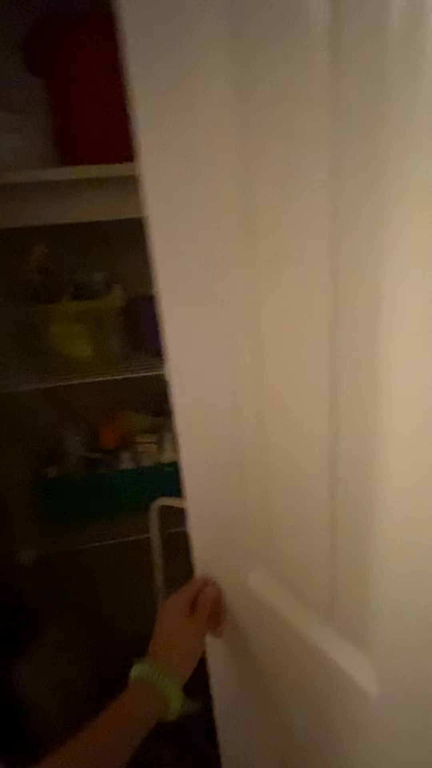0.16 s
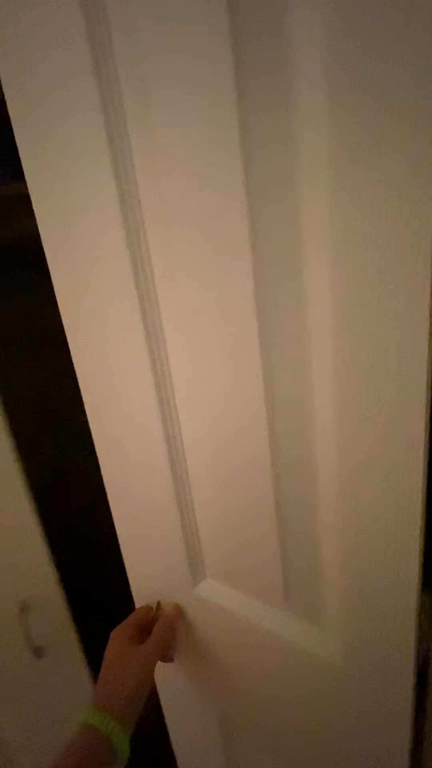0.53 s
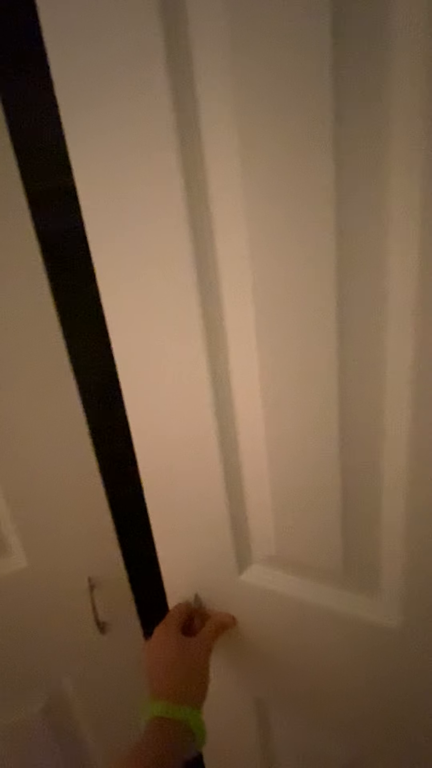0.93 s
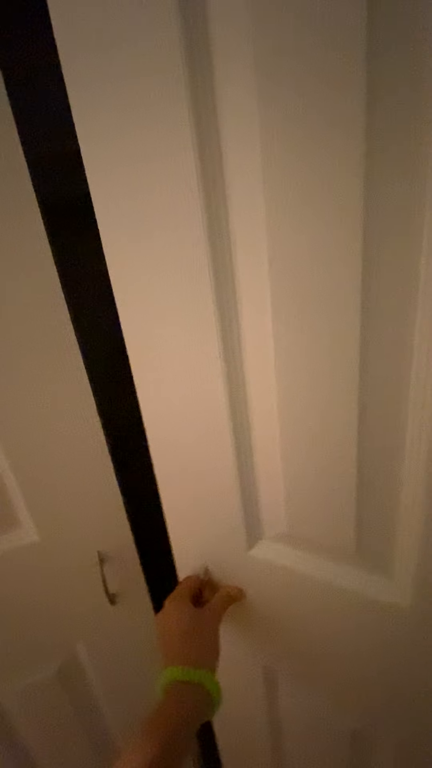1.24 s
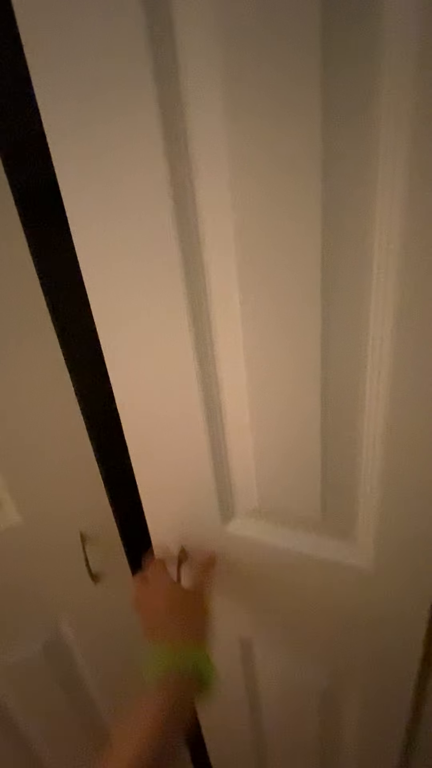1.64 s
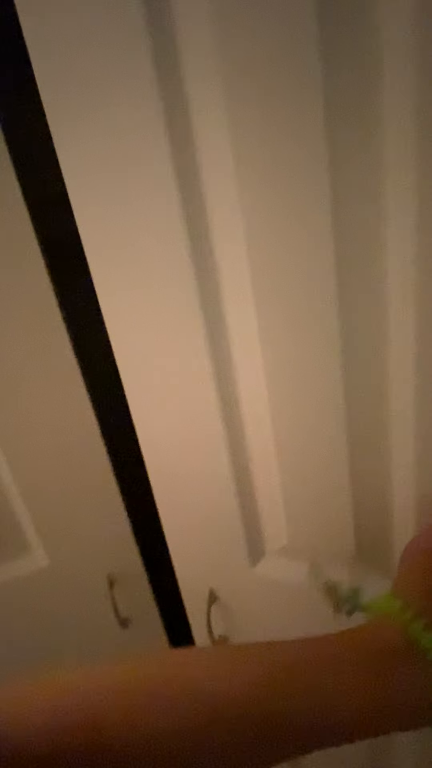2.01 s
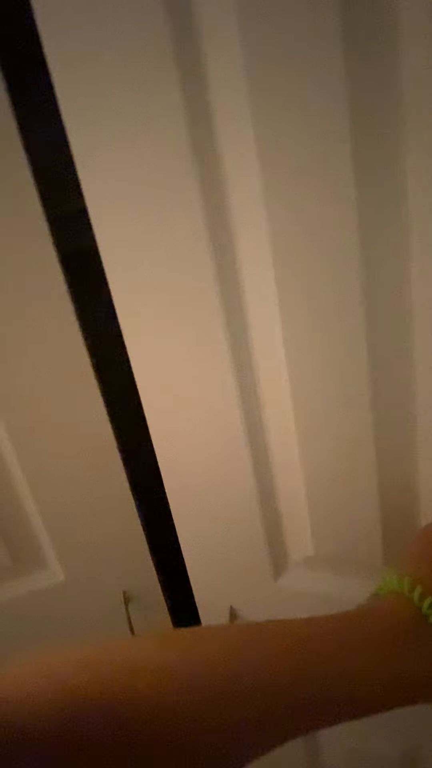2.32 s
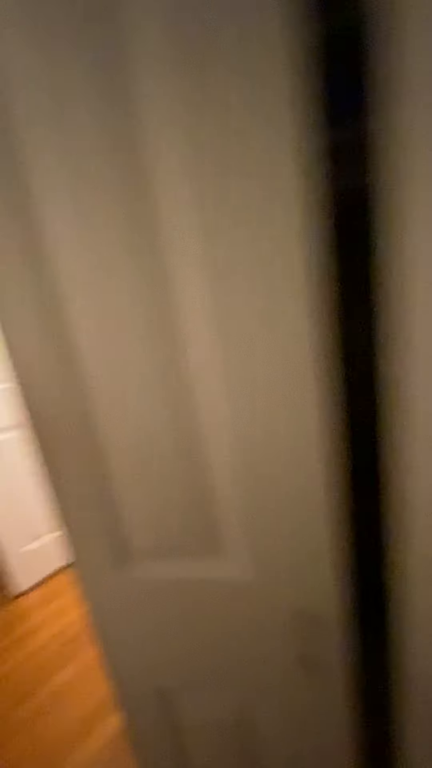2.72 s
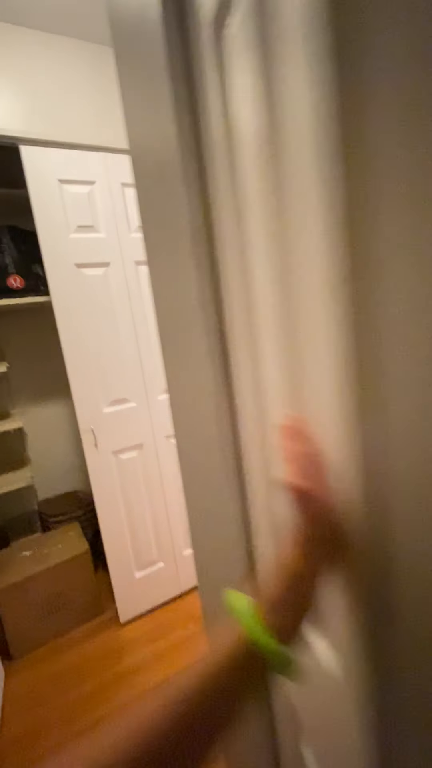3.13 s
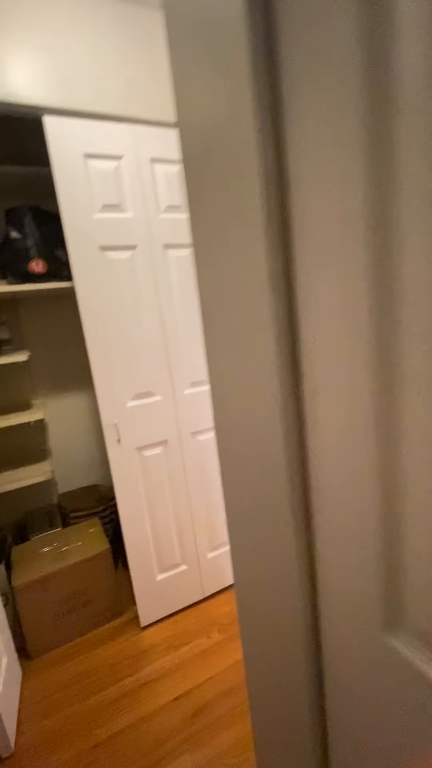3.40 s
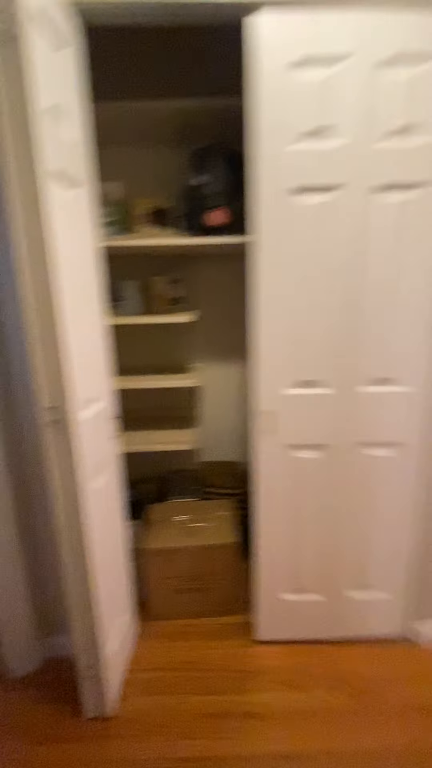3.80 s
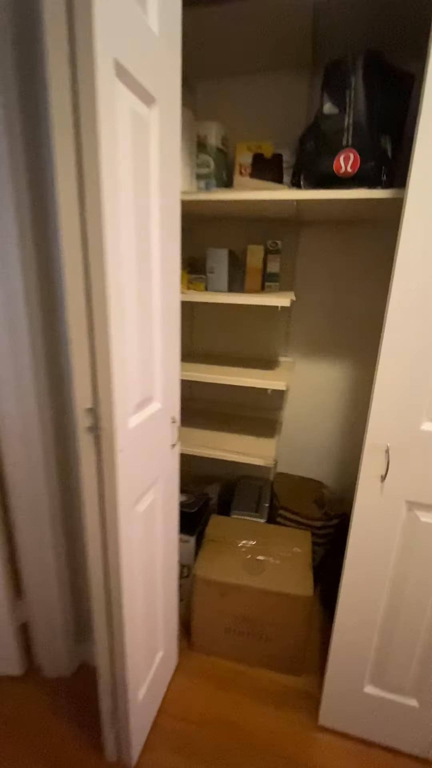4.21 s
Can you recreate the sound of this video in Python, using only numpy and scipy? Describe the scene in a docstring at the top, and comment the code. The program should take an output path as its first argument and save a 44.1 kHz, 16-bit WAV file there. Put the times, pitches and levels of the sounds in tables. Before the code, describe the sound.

A hollow folding closet door is drawn along its track, close to the microphone in a bare room. From 0 to 0.9 s there is uneven low rubbing and thin scraping, a soft bump, short groaning squeaks, then knocks and dry clicks around 0.6 to 0.9 s. Movement slows, with separate wooden knocks near 1.0, 1.2 and 1.4 s. Around 1.8 s a loose handle rattles lightly; a firm bump lands at 1.9 s. From 2.2 to 2.7 s comes the loudest stretch: rapid thuds, hinge knocks and rattling, ringing metal track. Keys jingle faintly from about 2.75 s, with small clicks and a thin spring twang to 3.1 s. A final push at 3.45 to 3.9 s brings wooden claps, knocks, a low judder and dull bumps. After that the rubbing dies away into quiet room hush, with a barely audible key tinkle just after 4 s.

```python
"""In a bare room, hollow folding closet doors are pulled open by hand, close to the microphone.
Guide pins scrape, squeak and catch in the metal top track: shaped noise, gliding tones and ringing rail modes.
Hinges knock, panel edges clap and panels shudder with dull bumps: damped wood modes and short noise bursts.
A loose handle rattles, a pin spring twangs and keys on the wrist jingle faintly: clusters of small ringing modes.
"""
import sys
import numpy as np
from scipy import signal
from scipy.fft import rfft, irfft, next_fast_len
from scipy.io import wavfile
from scipy.ndimage import uniform_filter1d, map_coordinates

SR = 44100
rng = np.random.default_rng(int(sys.argv[2]) if len(sys.argv) > 2 else 0)


def inscribe(sig):
    """Save sig as 16-bit PCM at rate SR to the path in sys.argv[1].

    A 1-D sig is mono; a 2-D sig holds one channel per row.
    Samples are clipped to [-1, 1] before scaling.
    """
    pcm = np.round(np.clip(np.atleast_2d(sig).T, -1, 1) * 32767)
    wavfile.write(sys.argv[1], SR, pcm.astype(np.int16))


N = 191923  # length in samples
AGE = np.arange(SR * 3 // 5) / SR  # seconds since a blow; every struck sound is cut at 0.6 s

# In all tables level_db and its kin are relative: each layer adds its own trim in the mix.
# the first door drawn along at an uneven speed: time_s, scrape_db, rub_db, shudder_db
OPENING = [(.06, -49, -40.5, -40.5), (.2, -48.5, -45.5, -45), (.35, -46, -38.5, -50.5),
           (.52, -52.5, -40.5, -46.5), (.74, -48, -35.5, -36), (.85, -54.5, -44.5, -50),
           (1.1, -73, -65, -61)]
# later pushes of the hand, each held and then coasting:
# start_s, hold_s, coast_t60_s, scrape_db, rub_db, shudder_db
PUSHES = [(1.206, 0.013, 0.19, -52, -37, -43), (1.631, 0.032, 0.63, -69, -41.5, -44.5),
          (1.769, 0.044, 0.56, -50, -35, -36), (2.007, 0.01, 1.2, -46, -35.5, -41.5),
          (2.182, 0.17, 3.1, -46, -37, -27.5), (3.187, 0.03, 0.51, -50.5, -46, -49.5),
          (3.455, 0.37, 0.49, -50.5, -41, -33)]
# friction floor of a door that is barely moving: scrape_db, rub_db, shudder_db
RESTING_DB = [-79.5, -59.5, -70]
# rough groans and squeaks of stick and slip: start_s, length_s, start_hz, end_hz, width_hz, level_db
SQUEAKS = [(0.049, .16, 410.6, 426.4, 25.5, -42), (0.313, .15, 400.4, 438, 24.2, -43),
           (0.24, 0.27, 1370, 1260, 80, -57), (1.922, .018, 5700, 5730, 200, -44.5),
           (1.378, .045, 1100, 1020, 110, -53), (1.505, 0.083, 1100, 1020, 130, -57),
           (3.185, .1, 2950, 3080, 300, -57.5)]
# the hand bumps a panel, or it swings against its stop: start_s, level_db, tilt_db_per_octave
BUMPS = [(0.082, -21.5, 1), (0.685, -24.5, -1.5), (1.223, -21.5, -2.5), (1.926, -15, -1.5),
         (2.06, -20, -2.5), (2.261, -16, 6), (2.369, -9, 4), (2.591, -13, 0.5), (2.8, -20.5, -14),
         (3.64, -17, 1.5), (3.879, -23.5, -15.5)]
# small dry clicks of the hardware: start_s, level_db
TICKS = [(0.242, -27), (0.755, -20.5), (0.86, -25), (0.88, -26.5), (1.139, -47.5), (1.414, -29),
         (1.664, -41.5), (1.9223, -33.5), (1.999, -31), (2.816, -20.5), (2.9936, -22.5), (3.022, -28),
         (3.089, -27), (3.408, -38)]
# hinges knocking as the doors fold: start_s, level_db, pitch_hz, clatter_db
KNOCKS = [(0.561, -25.5, 428, -19), (0.566, -21.5, 703, -22.5), (0.595, -45.5, 560, -12),
          (0.8812, -24.5, 398, -11.5), (0.9487, -43, 588, -1.5), (0.995, -16, 379.6, -23.5),
          (1.222, -23, 274.6, -17.5), (1.415, -20.5, 388.3, -16), (1.588, -43, 520, -2.5),
          (1.662, -33.5, 470, -11.5), (1.695, -37.5, 402, -6.5), (1.925, -21, 387, -23),
          (2.195, -17.5, 295, -13.5), (2.24, -29, 542, -5.5), (2.284, -18.5, 643, -8),
          (2.355, -16, 593, -10), (2.412, -21.5, 846, -8.5), (2.46, -19.5, 432, -8.5),
          (2.516, -20, 558, -11.5), (2.587, -23.5, 257, -36), (2.654, -27, 668, -16.5),
          (2.797, -25, 234, -30), (2.892, -26.5, 301.5, -15.5), (2.987, -30.5, 349, -15.5),
          (3.487, -24, 524, -16.5), (3.526, -21.5, 358, -24), (3.569, -20.5, 718, -9),
          (3.597, -26, 615, -10.5), (3.628, -25.5, 560, -7), (3.789, -27.5, 547, -7.5)]
# a pin catches in the track and jolts the panel: start_s, level_db, metal_edge_db, jolt_db
CATCHES = [(0.7734, -26, -26, -35), (1.1947, -39, -47, -61), (1.4148, -33, -11, -34),
           (2.0412, -33.5, -15.5, -32), (2.1957, -29, -8.5, -12.5), (2.2274, -27, -14, -17.5),
           (2.283, -21, -8.5, -7.5), (2.3414, -26, -13.5, -5.5), (2.4105, -20, -12, -6.5),
           (2.4527, -42, -10, -9.5), (2.5121, -22.5, -14.5, -10), (2.55, -25.5, -20.5, -19.5),
           (2.65, -22.5, -11.5, -16), (2.6975, -29, -11, -16), (2.7801, -30, -9.5, -20.5),
           (3.115, -38, -10.5, -26.5), (3.4077, -46, -3.5, -33.5), (3.5137, -28.5, -28.5, -12),
           (3.5662, -26.5, -21, -7.5), (3.6711, -31.5, -44, -21), (3.7351, -31.5, -36, -22)]
# the loose metal handle rattles under the fingers: start_s, length_s, level_db
RATTLES = [(1.761, 0.023, -42), (1.802, .04, -36), (2.011, .05, -30)]
# the wrist swings and the keys jingle: start_s, length_s, level_db
JINGLES = [(1.821, .15, -61), (1.993, 0.015, -48), (2.74, .38, -43), (4.055, 0.09, -63)]
# a sprung pivot pin twanging: start_s, level_db, t60_s
TWANGS = [(2.783, -55, .45), (3.003, -51.5, .4), (3.112, -50, .45)]
# a panel edge claps against its neighbour: start_s, level_db
CLAPS = [(3.446, -27), (3.5243, -16.5), (3.674, -25), (3.738, -26)]
# the dragged panel judders: start_s, hold_s, level_db
DRONES = [(3.528, 0.033, -17.5), (3.647, 0.1, -26), (3.809, 0.022, -30.5)]

# low modes of the hollow door panel: mode_hz, level_db, t60_s
PANEL_MODES = [(62.8, -4.5, 0.51), (77.9, 1.5, 0.27), (130.4, -0.5, 0.25), (158.6, -0.5, 0.24),
               (212.6, -4, 0.14), (258.5, -8.5, 0.37)]
# modes of the door frame and skins: mode_hz, level_db, t60_s
FRAME_MODES = [(371.6, -1.5, 0.4), (415, 5.5, 0.22), (620, -1, 0.12), (1013, 2, 0.14), (1387, 5.5, 0.05)]
# modes of the metal track, before extra damping: mode_hz, level_db, t60_s
RAIL_MODES = [(3340, -1, 0.21), (3740, 5.5, 0.12), (3606, 3.5, 0.19), (3840, -4, 0.15), (4530, 3.5, 0.19)]
# modes of the handle on its door skin: mode_hz, level_db, t60_s
HANDLE_MODES = [(588, -1.5, 0.085), (652, 1, 0.067), (1382, -1, 0.097), (2094, -8, 0.084),
                (2770, -9, 0.077), (3930, -10, 0.052)]
# modes of a small key: mode_hz, level_db, t60_s
KEY_MODES = [(7520, -5, .15), (11360, 0, .15), (11490, -5, .1), (13114, -14, .16)]
# partials of a struck wooden stile: pitch_multiple, level_db
STILE = [(1, 0), (1.53, -11.5), (2.17, -15.5)]

# pins grating in the track: freq_hz, level_db
SCRAPE = [(500, -23), (1100, -0.5), (1900, 5), (6200, 5), (8500, -2.5), (11000, -41.5), (14000, -2),
          (16000, -8.5)]
# wooden panels rubbing: freq_hz, level_db
RUB = [(120, -26.5), (250, -0.5), (410, 2), (700, -8), (1300, -13), (2200, -30), (5000, -52.5)]
# low shudder of the panels: freq_hz, level_db
SHUDDER = [(20, -12), (40, -7.5), (62, -2), (80, -1.5), (100, -1), (135, -7.5), (160, 1.5), (188, -23),
           (220, -7), (300, -21.5), (700, -100)]
# woody body of a knock: freq_hz, level_db
WOOD = [(90, -9.5), (230, 6.5), (430, 5), (640, -6.5), (900, -9), (2000, -63.5)]
# loose clatter of the frame: freq_hz, level_db
CLATTER = [(300, 3.5), (650, 7), (950, -7.5), (1500, -9), (2200, -9), (6000, -32.5)]
# rattle of the metal track: freq_hz, level_db
TRACK = [(300, 17), (800, 6.5), (1400, 3), (1900, -9.5), (2600, 6), (4200, 9), (4800, 3.5), (5800, 6.5),
         (7800, -0.5), (10000, -44), (15000, -5)]
# bright edge of metal on metal: freq_hz, level_db
EDGE = [(4000, -22), (7600, 1), (10000, -7), (12500, 0), (14500, 0), (15800, -6)]
# tiny hard click: freq_hz, level_db
CLICK = [(800, -47), (2500, 1.5), (5500, 14.5), (9000, -2), (15000, 12.5)]
# flat wood on wood: freq_hz, level_db
CLAP = [(300, 0.5), (720, 9.5), (950, 1), (1350, 2), (1850, -4.5), (2600, -6), (6000, -38)]
# hush of the room: freq_hz, level_db
HUSH = [(20, -54), (58, 10.5), (170, -8), (400, -51), (2000, -23), (5000, -30), (9000, -86)]
# decay of the bare room: freq_hz, t60_s
ROOM = [(60, 1), (250, 0.32), (700, 0.35), (2000, 0.42), (5000, 0.29), (13000, 0.074)]
# likeness of left and right: freq_hz, correlation (plain number)
ALIKE = [(290, 0.98), (640, 0.46), (1400, 0.11), (3100, 0.44), (5500, 0.21), (8000, 0.23), (14000, 0.35)]

START_S = 0.009  # time a door takes to get going
GRIT_PER_S, GRIT_DB = 140, -2  # slips of the pins, and their level against the grating
JOLT_LAG_S, JOLT_TILT_DB = 0.01461, 5  # the panel follows the pin; tilt per octave at 0 dB of edge
TILT_PER_EDGE, CLATTER_PER_EDGE = 0.42, -0.11  # dB per dB: less edge, duller thud, more wooden clatter
# the joints knock with every jolt, each at another spot (spread is of log pitch)
JOINT_DB, JOINT_HZ, JOINT_SPREAD, JOINT_CLATTER_DB = -13, 329.5, 0.17, -13.5
RING_CYCLES = 79  # cycles in a stile mode's t60: higher notes die sooner
TAP_DB, TAP_EDGE_DB = -5, -45  # a hinge's clatter also taps the track, with little metallic edge
CONTACTS_PER_S = 320  # of the rattling handle
TOUCHES_PER_S, TOUCH_SCATTER_DB, JINGLE_FADE_DB = 55, 2.5, 2  # of the keys
SPRING_HZ = 5782
DRONE_HZ, DRONE_RISE_S, DRONE_T60_S = 159, .02, 0.23
LEAD_S = 6e-5  # left microphone ahead of the right
TOP_HZ = 15800  # band limit


def amp(db):
    """Decibels to gain."""
    return 10 ** (np.asarray(db) / 20)


def unit(x):
    """x at rms 1."""
    return x / np.sqrt(np.mean(x ** 2) + 1e-20)


def along(points, hz):
    """(Hz, value) points read on a log frequency axis."""
    f, v = np.transpose(points)
    return np.interp(np.log(hz + 1), np.log(f + 1), v)


def wobble(rate):
    """A smooth random curve, rate knots a second."""
    knots = rng.standard_normal(int(N * rate / SR) + 4)
    return map_coordinates(knots, [np.arange(N) * rate / SR])


def noise(spectrum, size):
    """Coloured noise of rms 1 at two spaced microphones, whose likeness varies with frequency."""
    m = next_fast_len(size)
    hz = np.fft.rfftfreq(m, 1 / SR)
    # the mid/side balance sets the correlation of left and right
    turn = np.arccos(np.clip(along(ALIKE, hz), -.999, .999)) / 2
    white = rfft(rng.standard_normal((2, m)))
    coloured = white * amp(along(spectrum, hz))
    mid, side = irfft(coloured * [np.cos(turn), np.sin(turn)], m)[:, :size]
    return unit(np.array([mid + side, mid - side]))


def fade(t60):
    """Exponential decay by 60 dB in t60 seconds."""
    return np.exp(-np.log(1000) * AGE / t60)


def onset(attack):
    """Soft exponential start with time constant attack in seconds."""
    return 1 - np.exp(-AGE / attack)


def burst(spectrum, t60, room_db, attack):
    """A dense ring after a blow, and the bare room's answer, which dies at its own rate in each band."""
    hz, t, z = signal.stft(noise(spectrum, len(AGE)), SR, nperseg=256)
    decay = np.exp(-np.log(1000) * t / along(ROOM, hz)[:, None])
    tail = signal.istft(z * decay, SR, nperseg=256)[1][:, :len(AGE)]
    direct = noise(spectrum, len(AGE)) * fade(t60)
    return (direct + amp(room_db) * tail) * onset(attack)


def ring(modes, scatter_db, detune):
    """Damped modes, with new strengths and slightly new pitches at each blow."""
    chance = rng.standard_normal((len(modes), 2))
    total = 0
    for (hz, db, t60), (a, b) in zip(modes, chance):
        tone = np.sin(2 * np.pi * hz * (1 + detune * b) * AGE)
        total = total + amp(db + scatter_db * a) * fade(t60) * tone
    return total


def chatter(depth_db):
    """Gain of parts that touch again and again just after a blow."""
    return unit(amp(depth_db * wobble(420)[:len(AGE)]))


def add(track, s, sound):
    """Mix a sound into the track at time s."""
    start = max(round(s * SR), 0)
    track[:, start:start + len(AGE)] += sound[..., :N - start]


def moments(length, per_s):
    """Progress (0 to 1) of small contacts at uneven moments through a cluster."""
    count = max(round(length * per_s), 1)
    return (np.arange(count) + rng.random(count)) / count


def stroke(s, rise, hold, t60):
    """Gain of a movement that starts at s: rise, hold, then exponential coasting."""
    t = np.arange(N) / SR - s
    coasting = np.exp(-np.log(1000) * np.maximum(t - rise - hold, 0) / t60)
    return np.clip(t / rise, 0, 1) * coasting


def patchy(x, depth_db, size):
    """x with patches of random gain over pitch and time; size = (bins, frames) of the smoothing."""
    z = signal.stft(x, nperseg=1024)[2]
    field = rng.standard_normal(z.shape[1:])
    for _ in range(2):
        field = uniform_filter1d(field, size[0], 0)
        field = uniform_filter1d(field, size[1], 1)
    return unit(signal.istft(z * amp(depth_db * unit(field)), nperseg=1024)[1][:, :N])


def closet(x, echo_db):
    """Near walls send back weak copies within about 20 ms, slightly apart at each microphone: a comb."""
    out = x.copy()
    for delay, skew in rng.uniform([.001, -.0003], [.02, .0003], (7, 2)):
        lags = [round((delay + skew) * SR), round((delay - skew) * SR)]
        for side, lag in enumerate(lags):
            out[side, lag:] += amp(echo_db - 860 * delay) * x[side, :-lag]
    return out


def friction_levels():
    """Scrape, rub and shudder in dB: all three follow the opening pull and the later pushes of the hand."""
    times, *opening_db = np.transpose(OPENING)
    opening = amp([np.interp(np.arange(N) / SR, times, db) for db in opening_db])
    power = amp(RESTING_DB)[:, None] ** 2 + opening ** 2
    for s, hold, t60, *levels_db in PUSHES:
        push = amp(levels_db)[:, None] * stroke(s, START_S, hold, t60)
        power = power + push ** 2
    return 10 * np.log10(power)


def grit(count=4):
    """Tiny sticks and slips of the pins tick the track, in a few different grains of noise."""
    out = np.zeros((2, N))
    for _ in range(count):
        slips = (rng.random(N) < GRIT_PER_S / count / SR) * rng.random(N)
        tick = noise(SCRAPE, len(AGE)) * fade(.018) * onset(.001)
        out += signal.fftconvolve(slips[None], tick, axes=1)[:, :N]
    return unit(out)


def frame_taps():
    """Soft slips of random strength tap the frame's low modes, which ring differently at each side."""
    slips = (rng.random(N) < 150 / SR) * rng.standard_normal(N)
    low_modes = [mode for mode in FRAME_MODES if mode[0] < 900]
    sides = []
    for _ in range(2):
        tap = ring(low_modes, scatter_db=3.5, detune=0.018) * fade(0.13)
        sides.append(signal.fftconvolve(slips, tap)[:N])
    return unit(np.array(sides))


def sliding():
    """Uneven friction: the pins grate in the track, the panels rub and shudder, and slips tap the frame."""
    scrape_db, rub_db, shudder_db = friction_levels()
    grip = wobble(34.96)
    grating = patchy(noise(SCRAPE, N), depth_db=2.6, size=(14, 3))
    scrape_gain = amp(scrape_db - 2 + 1.1 * grip + 2.4 * wobble(500))
    scrape = scrape_gain * unit(grating + amp(GRIT_DB) * grit())
    rubbing = patchy(noise(RUB, N), depth_db=4, size=(3, 5))
    rub = amp(rub_db - 5.5 + 2.2 * grip) * (amp(1) * rubbing + amp(-4) * frame_taps())
    shudder = amp(shudder_db + 2.0) * noise(SHUDDER, N)
    return closet(scrape + rub, echo_db=-5.5) + shudder


def squeaks():
    """Sticking and slipping makes a tone that swells and dies while its rough pitch glides."""
    out = np.zeros((2, N))
    for s, length, start_hz, end_hz, width_hz, db in SQUEAKS:
        progress = np.minimum(AGE / length, 1)
        phase = 2 * np.pi * np.cumsum(start_hz + (end_hz - start_hz) * progress) / SR
        flutter = wobble(2 * width_hz)[:len(AGE)]
        drift = wobble(2 * width_hz)[:len(AGE)]
        swell = amp(db + 3 * flutter) * np.sin(np.pi * progress)
        add(out, s, swell * np.sin(phase + 1.3 * drift))
    return closet(out, echo_db=-0.5)


def bumps():
    """Heavy blows set the low modes of the hollow panels going; harder ones favour the upper modes."""
    out = np.zeros((2, N))
    jolts = [(s + JOLT_LAG_S, jolt_db, JOLT_TILT_DB + TILT_PER_EDGE * edge_db)
             for s, _, edge_db, jolt_db in CATCHES]
    for s, db, tilt_db in BUMPS + jolts:
        modes = [(hz, level + tilt_db * np.log2(hz / 100), t60) for hz, level, t60 in PANEL_MODES]
        panel = ring(modes, scatter_db=4.0, detune=0.033) * onset(0.0021)
        thud = burst(SHUDDER, t60=0.33, room_db=3.5, attack=0.00042)
        add(out, s, amp(db - 11.0) * panel + amp(db - 31.5) * thud)
    return out


def ticks():
    """Tiny hard contacts close by, nearly dry: very short bright noise."""
    out = np.zeros((2, N))
    for s, db in TICKS:
        add(out, s, amp(db - 11) * burst(CLICK, t60=.019, room_db=-9, attack=.00008))
    return out


def knocks():
    """Wood meets wood at the joints: a hollow note, set by the spot that is struck, and the frame clattering."""
    out = np.zeros((2, N))
    shaken = []
    for s, db, edge_db, jolt_db in CATCHES:
        hz = JOINT_HZ * np.exp(JOINT_SPREAD * rng.standard_normal())
        clatter_db = JOINT_CLATTER_DB + CLATTER_PER_EDGE * edge_db
        shaken.append((s, (db + jolt_db) / 2 + JOINT_DB, hz, clatter_db))
    for s, db, hz, clatter_db in KNOCKS + shaken:
        modes = [(hz * multiple, level, RING_CYCLES / (hz * multiple)) for multiple, level in STILE]
        note = ring(modes, scatter_db=1, detune=.01) * onset(.002)
        body = note + amp(-8.5) * burst(WOOD, t60=0.2, room_db=0.0, attack=0.006)
        frame = ring(FRAME_MODES, scatter_db=3, detune=0.03)
        clatter = amp(-11.5) * frame + burst(CLATTER, t60=0.082, room_db=-2.5, attack=0.00027)
        clatter = clatter * chatter(depth_db=3.5)
        add(out, s, amp(db - 9.5) * body + amp(db + clatter_db - 2.5) * clatter)
    return out


def clacks():
    """A pin sticks and jumps: the track rattles and rings, with a bright edge when metal meets metal."""
    out = np.zeros((2, N))
    taps = [(s, db + clatter_db + TAP_DB, TAP_EDGE_DB) for s, db, _, clatter_db in KNOCKS]
    for s, db, edge_db, *_ in CATCHES + taps:
        # each side rings on its own
        rail = np.array([ring(RAIL_MODES, scatter_db=4.5, detune=0.012) * fade(0.57) for _ in range(2)])
        rattle = burst(TRACK, t60=.07, room_db=-6, attack=.0006) * chatter(depth_db=3.5)
        edge = burst(EDGE, t60=.027, room_db=9, attack=.00005)
        clack = amp(db - 3.5) * rattle + amp(db - 19.5) * rail
        add(out, s, clack + amp(db + edge_db - 10) * edge)
    return closet(out, echo_db=-12)


def handle():
    """A quick cluster of small contacts, swelling and fading, rings the handle."""
    out = np.zeros((2, N))
    for start, length, db in RATTLES:
        for progress in moments(length, CONTACTS_PER_S):
            metal = ring(HANDLE_MODES, scatter_db=4.5, detune=0.0047)
            knock = burst(CLATTER, t60=0.014, room_db=-5.5, attack=0.00023)
            gain = amp(db - 11.5) * np.sin(np.pi * progress)
            add(out, start + progress * length, gain * (metal + amp(-2) * knock))
    return closet(out, echo_db=-5.5)


def keys():
    """Small keys touch at uneven moments, on average ever more gently; each touch rings high, slightly detuned."""
    out = np.zeros((2, N))
    for start, length, db in JINGLES:
        for progress in moments(length, TOUCHES_PER_S):
            key = ring(KEY_MODES, scatter_db=3, detune=.007) * onset(.001)
            touch_db = db - JINGLE_FADE_DB * progress + TOUCH_SCATTER_DB * rng.standard_normal()
            add(out, start + progress * length, amp(touch_db) * key)
    return out * amp(4.5 * wobble(70) - 2)


def spring():
    """The spring of a pivot pin, straight ahead, rings on in a thin wavering tone."""
    out = np.zeros((2, N))
    for s, db, t60 in TWANGS:
        tone = np.sin(2 * np.pi * SPRING_HZ * AGE)
        add(out, s, amp(db) * tone * fade(t60) * onset(.002))
    return out * amp(2 * wobble(40))


def claps():
    """Flat wood on wood: a short, dry crack."""
    out = np.zeros((2, N))
    for s, db in CLAPS:
        add(out, s, amp(db - 6.0) * burst(CLAP, t60=0.061, room_db=-13.0, attack=0.00099))
    return out


def drone():
    """The dragged panel judders unevenly near one of its modes, with a slightly weaker octave below."""
    swing = sum(amp(db) * stroke(s, DRONE_RISE_S, hold, DRONE_T60_S) for s, hold, db in DRONES)
    swing = swing * amp(2.0 * wobble(23.96))
    phase = 2 * np.pi * DRONE_HZ * np.arange(N) / SR + 0.33 * wobble(20)
    return swing * (np.sin(phase) + amp(-0.5) * np.sin(phase / 2))


def spaced(x):
    """The sound reaches the left microphone a moment before the right: a phase turn split between them."""
    m = next_fast_len(N + SR // 2)
    turn = np.pi * LEAD_S * np.fft.rfftfreq(m, 1 / SR)
    return irfft(rfft(x, m) * np.exp(1j * np.array([turn, -turn])), m)[:, :N]


def scene():
    """Doors and keys, slightly louder on the right, over the hush of the room; the spring sits in the middle."""
    doors = sliding() + squeaks() + bumps() + ticks() + knocks() + clacks()
    doors = doors + handle() + keys() + claps() + drone()
    hush = amp(-55.5) * noise(HUSH, N)
    return spaced(doors * amp([[-.8], [.8]]) + hush) + spring()


def record(dry):
    """The microphone thins the deepest bass, and nothing is kept above the band limit."""
    thinned = signal.sosfilt(signal.butter(3, 34, "highpass", fs=SR, output="sos"), dry)
    m = next_fast_len(N + SR // 2)
    kept = np.fft.rfftfreq(m, 1 / SR) < TOP_HZ
    return irfft(rfft(thinned, m) * kept, m)[:, :N]


dry = scene()
out = record(dry)
inscribe(out)
```